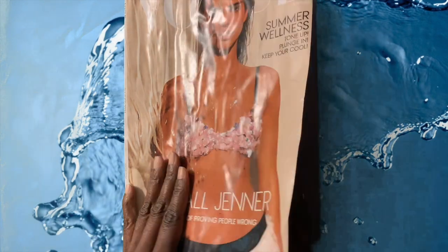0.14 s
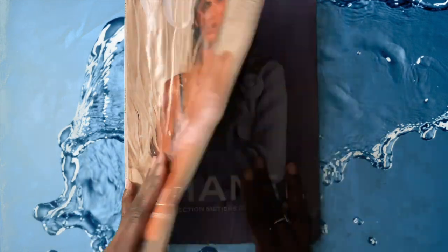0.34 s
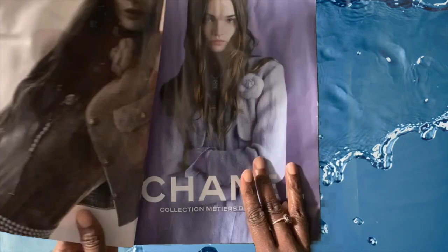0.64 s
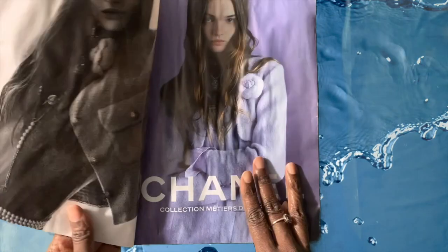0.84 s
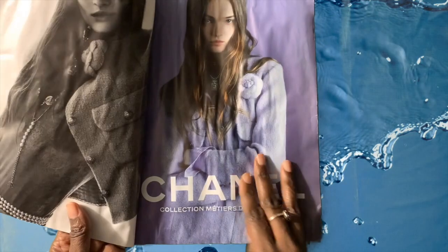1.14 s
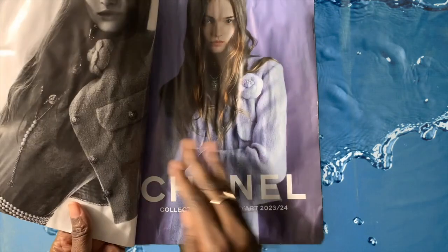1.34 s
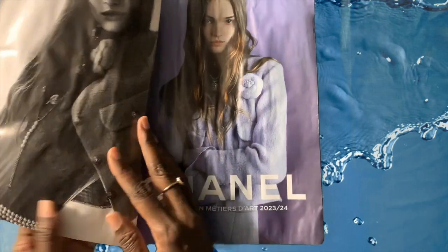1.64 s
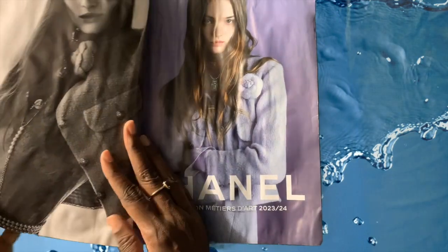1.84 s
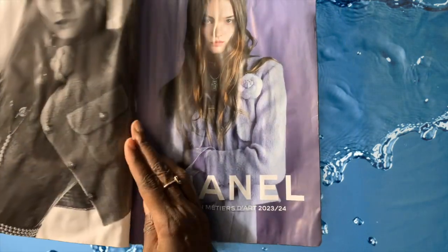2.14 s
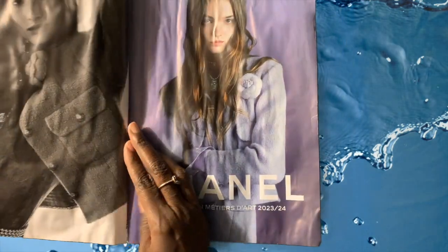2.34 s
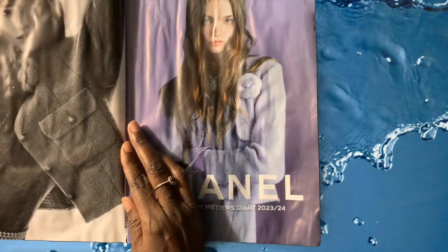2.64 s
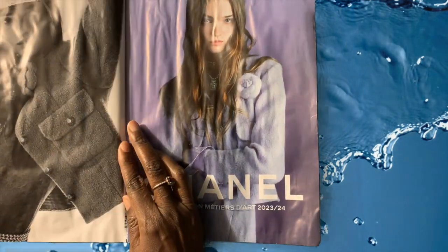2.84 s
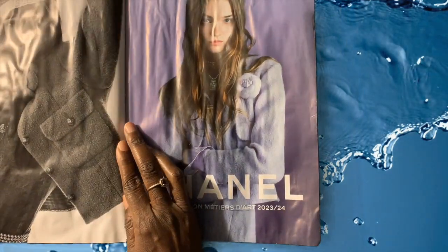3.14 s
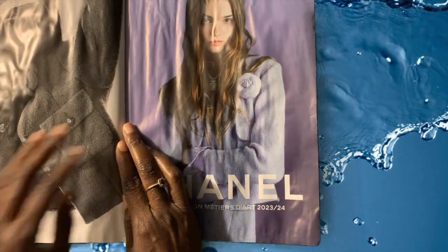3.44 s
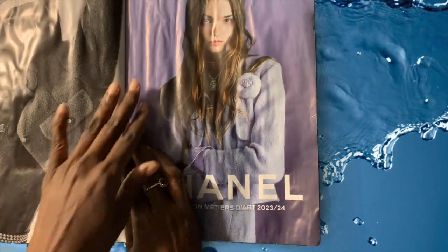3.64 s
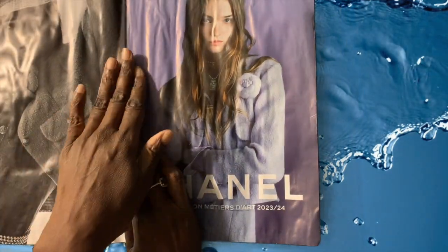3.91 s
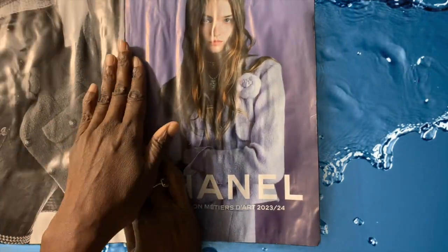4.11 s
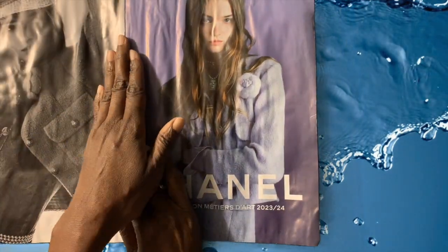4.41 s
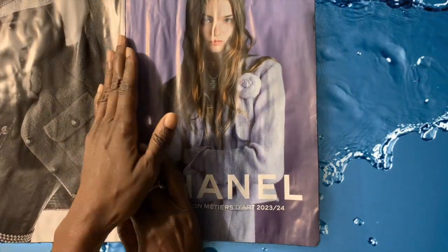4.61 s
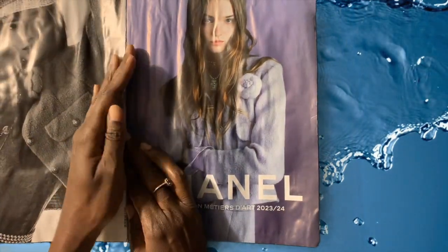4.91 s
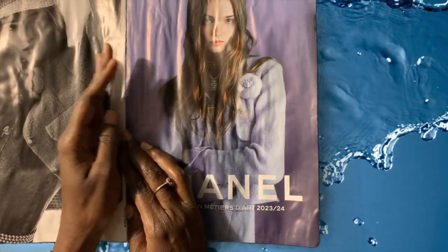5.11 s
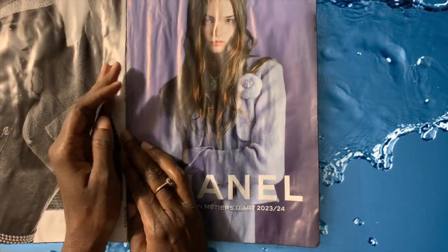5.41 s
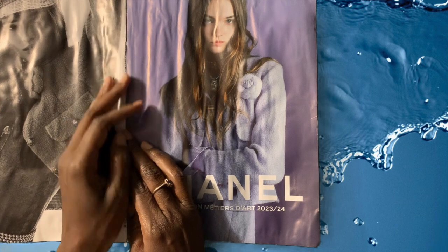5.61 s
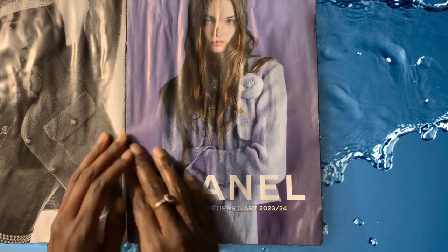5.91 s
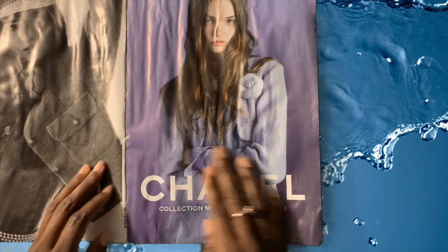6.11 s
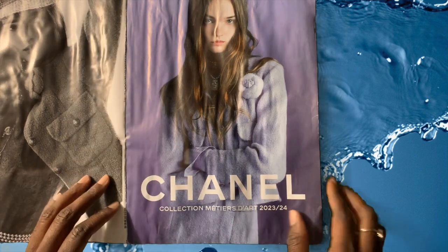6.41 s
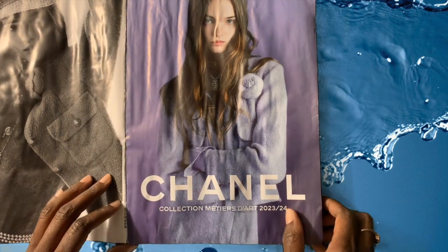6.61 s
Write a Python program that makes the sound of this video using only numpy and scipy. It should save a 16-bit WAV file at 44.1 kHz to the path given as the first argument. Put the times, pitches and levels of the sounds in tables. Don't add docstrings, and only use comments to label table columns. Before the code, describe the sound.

Hands turn and flatten a stiff, shiny magazine page on a table. Crisp cracks and tiny ticks come in irregular clusters, with soft papery rustle between them. Skin rubs the gloss in short hisses at first, then in longer, louder swishes near the end. The pickup is close and stereo, the room short and dry, with steady low beating hum and faint hiss.

```python
import sys
import numpy as np
from scipy import signal
from scipy.fft import rfft, irfft, next_fast_len
from scipy.io import wavfile
from scipy.ndimage import uniform_filter1d, map_coordinates

SR = 44100
rng = np.random.default_rng(int(sys.argv[2]) if len(sys.argv) > 2 else 0)


def digitize_waveform(pressure):
    field = np.atleast_2d(pressure).T
    bounded = np.clip(field, -1, 1)
    quanta = np.round(bounded * 32767).astype(np.int16)
    wavfile.write(sys.argv[1], SR, quanta)


def how_loud(loudness_db):
    steps = np.asarray(loudness_db, float) / 20
    return 10 ** steps


N = 298116


def unit(x):
    return x / np.sqrt(np.mean(x ** 2) + 1e-20)


def crest(x):
    return x / np.abs(x).max()


def along(points, hz):
    f, v = np.transpose(points)
    return np.interp(np.log(hz + 1), np.log(f + 1), v)


def curves(rows):
    s, *cols = np.transpose(rows)
    return [np.interp(np.arange(N) / SR, s, c) for c in cols]


def wobble(rate):
    knots = rng.standard_normal(int(N * rate / SR) + 4)
    return map_coordinates(knots, [np.arange(N) * rate / SR])


def filtered(x, response):
    n = x.shape[-1]
    m = next_fast_len(n + min(n, 4096))
    return irfft(rfft(x, m) * response(np.fft.rfftfreq(m, 1 / SR)), m)[..., :n]


def peak(hz, centre_hz, q):
    damping = 1j * hz * centre_hz / q
    return damping / (centre_hz ** 2 - hz ** 2 + damping)


def rush(spectrum, patchy_db):
    mottle_db = 2.5
    z = signal.stft(rng.standard_normal((2, N)), nperseg=256)[2]
    patches = uniform_filter1d(rng.standard_normal(z.shape[1:]), 8, 0)
    patches = uniform_filter1d(patches, 10, 1)
    pair = signal.istft(z * how_loud(patchy_db * unit(patches)), nperseg=256)[1][:, :N]
    z = signal.stft(pair, nperseg=2048)[2]
    flecks = uniform_filter1d(rng.standard_normal(z.shape[1:]), size=2, axis=0)
    flecks = uniform_filter1d(flecks, size=2, axis=1)
    pair = signal.istft(z * how_loud(mottle_db * unit(flecks)), nperseg=2048)[1][:, :N]
    return unit(filtered(pair, lambda hz: how_loud(along(spectrum, hz))))


# (f/Hz, t60/s)
ROOM_T60 = [(200, 0.36), (1200, 0.17), (4000, 0.25), (12000, 0.18)]
# (f/Hz, level/dB)
ROOM_COLOUR = [(500, -0.5), (1500, -1), (2500, 2.5), (4000, 3)]


def add_with_room(out, s, burst, wet_db):
    hz, t, z = signal.stft(rng.standard_normal((2, SR // 4)), SR, nperseg=128)
    decay_db = along(ROOM_COLOUR, hz)[:, None] - 60 * t / along(ROOM_T60, hz)[:, None]
    tail = signal.istft(z * how_loud(decay_db), SR, nperseg=128)[1]
    wet = signal.fftconvolve(burst[:1], tail / np.linalg.norm(tail[0]), axes=1)
    late = max(0, -round(s * SR))
    start, burst, wet = max(0, round(s * SR)), burst[:, late:], wet[:, late:]
    out[:, start:start + burst.shape[1]] += burst
    first = start + 200
    out[:, first:first + wet.shape[1]] += how_loud(wet_db - np.array([[0], [3.0]])) * wet


# (t/s, peak level/dB, panel f/Hz, edge level/dB, thump level/dB)
CRACKS = [(0.0042, -18, 1480, -4.5, -24), (0.2795, -25, 1360, -13, -14.5), (1.113, -48.5, 1253, -5.5, -27),
          (1.541, -18.5, 1300, -15.5, -54), (1.637, -46.5, 1010, 0.5, -11),
          (2.0855, -19.5, 1235, -1.5, -58), (2.987, -46, 1187, -3, -30), (3.042, -32, 1020, -22, -24),
          (3.101, -32.5, 750, -22.5, -14), (4.115, -27.5, 1320, 4, -19), (4.179, -21, 1140, -6, -14.5),
          (4.1819, -19.5, 1150, -2.5, -20), (4.1835, -32, 534, -10, -37), (4.376, -47, 1650, -2, -23),
          (4.8833, -15.5, 1530, -30.5, -41), (4.897, -24, 750, -2, -16), (5.356, -53.5, 1260, -21, -11),
          (6.178, -24.5, 1900, -24, -21.5), (6.189, -25, 1370, -11, -13.5), (6.235, -25.5, 1300, 0, -16.5),
          (1.066, -53, 2600, -15, -32)]
# (t/s, peak level/dB, panel f/Hz, belly level/dB, thump level/dB)
POPS = [(0.077, -23, 880, -14.5, -18.5), (0.29, -37, 694, -1, -8), (0.77, -21.5, 803, -12.5, -26),
        (1.2133, -23, 1167, -10, -15.5), (1.688, -44, 605, -10, -12.5), (1.806, -37, 790, -5, -1),
        (2.262, -34.5, 740, -7, -4), (2.282, -42, 450, -18, 1), (2.32, -34, 840, -21, -13.5),
        (2.629, -46.5, 795, -6, -7.5), (3.137, -36, 975, -7, -5.5), (3.646, -40.5, 1100, -31, -33),
        (4.06, -38.5, 990, -4, 2.5), (4.191, -38.5, 1340, -13, 2), (5.962, -46, 600, -12, -4),
        (6.743, -41.5, 770, -17, -26.5)]
# (t/s, peak level/dB, panel f/Hz)
REBOUNDS = [(0.016, -43.5, 1760), (1.5419, -19, 1110), (1.552, -32, 850), (2.1, -35.5, 1500),
            (2.113, -35, 1550), (4.126, -28.5, 2200), (4.887, -22.5, 1020), (4.89, -30, 800),
            (4.918, -35, 2200), (4.939, -38, 1200), (4.945, -40, 1300), (0.075, -37, 910),
            (2.089, -29, 950), (6.181, -32, 1030), (6.2405, -35, 1400), (3.142, -41.5, 690),
            (3.105, -42.5, 620), (4.2, -53, 950), (3.676, -54, 940), (0.298, -40.5, 2100),
            (1.547, -31.5, 2500), (6.03, -41, 1700), (5.953, -47.5, 1200), (4.932, -26.5, 1250),
            (0.2822, -24.5, 1090), (1.226, -43, 1850), (1.241, -45, 1500), (4.12, -32, 1800),
            (4.194, -29, 2180)]
# (t/s, peak level/dB, panel f/Hz)
FLICKS = [(0.2795, -27.5, 2120), (0.79, -46, 1600), (1.214, -41.5, 2740), (1.5415, -24, 2560),
          (2.0855, -44, 2000), (2.261, -51, 2010), (2.32, -58, 1900), (3.101, -37, 1980),
          (4.057, -41, 1500), (0.7835, -37, 920), (0.7755, -35, 706), (2.0858, -29, 3500),
          (2.125, -42, 1700), (2.14, -47, 1650), (2.158, -46, 1750), (4.198, -34, 1330),
          (4.1155, -29, 2400), (4.1795, -27, 2140), (4.183, -23, 2240), (4.8955, -20.5, 2100),
          (6.2355, -49, 2200), (1.801, -44, 900), (1.811, -35, 534), (2.0865, -32, 770),
          (4.8975, -33, 3900), (0.197, -55.5, 1400), (0.18, -57, 1400), (4.9, -33, 400), (4.925, -40, 1150),
          (6.203, -41, 1800), (6.227, -45, 1700), (6.247, -41, 1500), (1.2165, -35, 800),
          (0.7705, -36, 1600), (0.7925, -46, 1500), (4.185, -26, 600), (4.129, -36, 1700),
          (4.067, -40, 600)]


def buckles():
    sharp, dull = 6, 1.97
    cracks = [(s, db, hz, edge, -11, thump, sharp) for s, db, hz, edge, thump in CRACKS]
    pops = [(s, db, hz, -48, belly, thump, dull) for s, db, hz, belly, thump in POPS]
    rebounds = [(s, db, hz, -14, -19, -24, sharp) for s, db, hz in REBOUNDS]
    flicks = [(s, db, hz, -30, -30, -30, sharp) for s, db, hz in FLICKS]
    return cracks + pops + rebounds + flicks


def snaps():
    lead_s = .012
    bend_ms = .9
    afterslip_db, afterslip_s = -37.5, .12
    askew, askew_s = .55, .0006
    out, t = np.zeros((2, N + SR)), np.arange(2200) / SR - lead_s

    def spread(f):
        octaves = np.log(16000 / np.clip(f, 150, 16000))
        return np.exp(2j * np.pi * bend_ms * octaves) / (1 + 1j * f / 4500) ** 2

    for s, db, panel_hz, edge_db, belly_db, thump_db, dull in buckles():
        swell = np.where(t < 0, how_loud(-39 + 60 * t / .035), how_loud(afterslip_db - 60 * t / afterslip_s))
        jerks = how_loud(4 * rng.standard_normal(len(t) // 20).repeat(20))
        slips = rng.standard_normal((2, len(t))) * swell * jerks
        slips[:, t.searchsorted(0)] += [1, 0]
        slips[1, t.searchsorted(rng.uniform(0, askew_s))] += askew * rng.choice([-1, 1])
        slips[:, t.searchsorted(.0035)] -= [.25, 0]

        def ring(f):
            modes = peak(f, panel_hz, 1.31) - 0.15 * peak(f, 2.12 * panel_hz, 1.8)
            corner_hz = dull * panel_hz
            treble_loss = (1 + 1j * f / (corner_hz * 1.26) - (f / corner_hz) ** 2) ** 2
            return spread(f) * peak(f, panel_hz, 2.15) * modes / treble_loss

        panel = filtered(slips, ring)
        edge = filtered(slips, lambda f: spread(f) * (2.1 * peak(f, 4500, 2.2) ** 2 - peak(f, 2700, 1.2) ** 2))
        belly = filtered(slips, lambda f: spread(f) * peak(f, 613, 3.1) ** 2)
        thump = filtered(slips, lambda f: spread(f) * peak(f, 267, 0.92) ** 2)
        burst = crest(panel) + how_loud(edge_db + 2.5) * crest(edge)
        burst = burst + how_loud(belly_db - 3.0) * crest(belly) + how_loud(thump_db + 2.0) * crest(thump)
        add_with_room(out, s - lead_s, how_loud(db) * burst, wet_db=-9.0)
    return out[:, :N]


# (t/s, peak level/dB, f/Hz)
TICKS = [(0.0042, -25, 4605), (0.007, -27, 6160), (0.771, -48.5, 4600), (1.066, -55, 7000),
         (1.541, -43, 4300), (0.28, -41, 3990), (6.2353, -41.5, 4500), (1.1135, -56.5, 6840),
         (1.67, -44.5, 7400), (2.0858, -31, 5340), (2.2225, -42.5, 12900), (2.241, -39, 8300),
         (2.2596, -43, 8300), (2.496, -53.5, 13100), (2.5606, -56, 6000), (2.797, -56, 7470),
         (2.8913, -49.5, 13330), (2.988, -54, 7130), (3.034, -42.5, 7400), (3.059, -40, 8400),
         (3.1198, -39, 6340), (3.13, -35, 6350), (3.1325, -33.5, 6600), (3.387, -57.5, 13300),
         (3.647, -67, 12400), (4.116, -33, 5440), (4.151, -47, 11530), (4.162, -42, 10430),
         (4.8833, -50.5, 5300), (4.897, -37, 7130), (5.1073, -58, 6450), (5.191, -51.5, 12900),
         (6.139, -36, 8050), (4.1828, -32, 5440)]


def ticks():
    out, t = np.zeros((2, N + SR)), np.arange(256) / SR
    for s, db, tick_hz in TICKS:
        spit = rng.standard_normal((2, len(t))) * how_loud(-60 * t / 0.007)
        spit = filtered(spit, lambda f: peak(f, tick_hz, 0.58) ** 3)
        add_with_room(out, s, how_loud(db + 5.5) * crest(spit), wet_db=-9.5)
    return out[:, :N]


# (t/s, drag level/dB, slackness 0-1)
DRAG = [
    [(0.0, -82.5, .5), (0.17, -68, 0.3), (0.28, -69.5, 0.35), (0.39, -69, 0.53), (0.71, -71, 0.33),
     (0.87, -92.5, 0), (1.1, -78, 0.1), (1.29, -72, 0.9)],
    [(1.57, -68, 0.9), (1.69, -74, 0.2), (1.74, -62.5, 0.98), (1.93, -66, 0.6), (2.18, -58.5, 0.1),
     (2.34, -73.5, 0.63), (3.04, -74.5, 0.45), (3.24, -103, 0), (3.64, -81.5, 0.32)],
    [(3.65, -65.5, 1), (3.827, -71.5, .9), (4.177, -59.5, 0), (4.231, -70.5, 0.4), (4.389, -66, 0.26),
     (4.463, -76.5, 0.1), (4.735, -62, 0), (4.877, -69.5, 0.66), (5.445, -74.5, 0.3)],
    [(5.449, -65, 0.26), (5.641, -58, 0.25), (5.977, -68.5, 0.6), (6.221, -89, 0.5), (6.323, -63, 0.35),
     (6.535, -85.5, 0.7), (6.76, -65, 0.07)],
]
# (middle t/s, half length t/s, extra level/dB)
LIFTS = [
    (0.205, 0.21, 5),
    (1.844, 0.4, 15),
    (3.844, 0.16, -19),
    (4.25, 0.17, 9.5),
    (5.15, 0.37, -20.5),
    (6.1, 0.26, 11),
]
# (f/Hz, level/dB per Hz)
TAUT_SHEET = [(500, -40.5), (900, -22.5), (1650, 0), (2500, -10), (3700, -16), (6000, -20)]
# (f/Hz, level/dB per Hz)
SLACK_SHEET = [(450, -35), (800, -6), (1200, 4.5), (1600, -2.5), (3000, -24.5), (6000, -32.5)]
# (f/Hz, level/dB per Hz)
FLAP = [(120, -28), (250, -9.5), (600, 2.5), (900, 7), (1400, -38.5)]


def sheet():
    drag_db, slack = curves(np.concatenate(DRAG))
    t = np.arange(N) / SR
    lift_db = sum(db * np.clip(1 - np.abs(t - s) / half, 0, 1) for s, half, db in LIFTS)
    flap_db = -76.5 + 0.31 * (drag_db + 68) + lift_db
    turn = np.pi / 2 * np.clip(slack, 0, 1)
    grip = 0.5 * wobble(27) + 0.5 * wobble(250)
    taut = np.cos(turn) * rush(TAUT_SHEET, patchy_db=3.3)
    loose = np.sin(turn) * rush(SLACK_SHEET, patchy_db=3.0)
    flapping = how_loud(flap_db + 1.5 * grip) * rush(FLAP, patchy_db=1.5)
    return how_loud(drag_db + grip) * (taut + loose) + flapping


def slope(start, length, first_db, last_db, rise, fall):
    t = np.arange(N) / SR - start
    course = np.interp(t, [0, length], [first_db, last_db])
    return course + rise * np.minimum(t, 0) - fall * np.maximum(t - length, 0)


# (start t/s, length t/s, first level/dB, last level/dB, lower hiss level/dB)
STROKES = [(0.416, 0.16, -85, -69, 7), (0.557, 0.1, -70, -66.5, 4), (1.393, .21, -75.5, -60.5, 5.5),
           (1.614, 0.076, -61, -57, -1), (1.689, 0.19, -52.5, -64, 3), (0.997, .03, -73, -73, -7),
           (1.071, 0.057, -76, -73.5, -2.5), (1.869, 0.057, -64, -50, 4.5), (1.92, 0.18, -54.5, -76.5, 4.5),
           (2.18, 0.092, -74.5, -59, 0), (2.266, 0.17, -65, -81.5, 4), (2.941, 0.11, -79.5, -65, 8),
           (3.039, 0.066, -69.5, -52.5, 7.5), (3.648, 0.26, -62, -66, 0), (3.939, 0.21, -68, -60.5, 1.5),
           (4.614, 0.06, -85.5, -72, 13), (4.658, 0.14, -71, -62, 4.5), (5.453, 0.052, -70, -59, 4),
           (5.495, .24, -56.5, -54.5, 2.5), (5.754, 0.38, -59, -47, -2.5),
           (6.131, 0.26, -44.5, -57.5, -3.5), (6.468, 0.021, -70.5, -58, -9.5),
           (6.482, 0.22, -68, -79, -6.5)]
# (t/s, peak level/dB, fade/dB per s, lower hiss level/dB)
BRUSHES = [(0.006, -53, 328.5, 3.5), (0.29, -81, 100, 5), (2.09, -73.5, 155, 15), (2.5, -78.5, 393, 4),
           (2.559, -72.5, 147, 2.5), (2.8, -75, 454, 9), (2.89, -78, 993.5, -6), (3.38, -83, 87, 3),
           (2.825, -73, 800, -4), (4.191, -79, 208, 12.5), (4.381, -71.5, 233, 9), (4.902, -62, 254, 5.5),
           (5.118, -86, 589, -10), (5.193, -69.5, 288, 4), (5.358, -73.5, 495, 8.5)]
# (f/Hz, level/dB per Hz)
SKIN = [(4000, -52), (7000, -5), (9500, 1.5), (12000, -1), (15500, -2.5)]
# (f/Hz, level/dB per Hz)
GLOSS = [(600, -31.5), (1300, -6.5), (2000, -5.5), (2700, -11.5), (3800, -4.5), (4800, -7), (6500, -2),
         (8500, -17), (11000, -20.5)]


def palms():
    land, lift, brush_rise = 1799, 282, 702
    touches = [(slope(s, n, a, b, land, lift), low) for s, n, a, b, low in STROKES]
    touches += [(slope(s, 1 / SR, db, db, brush_rise, fade), low) for s, db, fade, low in BRUSHES]
    hiss_db = np.max([db for db, low in touches], axis=0)
    lower_db = np.max([db + low for db, low in touches], axis=0)
    grip = 0.75 * wobble(25) + 0.78 * wobble(400)
    skin = how_loud(hiss_db + 5.0 + grip) * rush(SKIN, patchy_db=2.0)
    return skin + how_loud(lower_db - 1.5 + grip) * rush(GLOSS, patchy_db=2.5)


# (t/s, level/dB)
POCKET = [
    (3.644, -100),
    (3.65, -66),
    (3.72, -69),
    (3.76, -67),
    (3.8, -73),
    (3.87, -67.5),
    (3.9, -92),
]


def pocket():
    air = filtered(rng.standard_normal((2, N)), lambda f: peak(f, 1220, q=8) ** 2)
    opened = np.arange(N) > POCKET[-1][0] * SR
    return how_loud(curves(POCKET)[0] + 1.5 * wobble(30) - 200 * opened) * unit(air)


# (f/Hz, rms level/dB, start phase/turns)
MOTORS = [(58.29, -51, -.11), (49.06, -63, .11), (83.69, -63, -.39), (174.87, -76, .02)]
# (t/s, f/Hz)
FAN_HZ = [(0, 50.17), (.75, 50.34), (1.25, 50.16), (1.75, 49.96), (2.5, 49.83), (3.25, 49.96), (4, 50.05),
          (4.75, 50.13), (6.76, 50.1)]


def hum():
    t = np.arange(N) / SR
    tones = sum(how_loud(db + .4 * wobble(0.64)) * np.cos(2 * np.pi * (hz * t + turns)) for hz, db, turns in MOTORS)
    fan_turns = np.cumsum(curves(FAN_HZ)[0]) / SR + .34
    fan = how_loud(-55.0 + .4 * wobble(4.5)) * np.cos(2 * np.pi * fan_turns)
    both = np.sqrt(2) * (tones + fan)
    return np.array([both, np.interp(t - 2.5e-4, t, both)])


# (f/Hz, level/dB per Hz)
ROOM_HISS = [(20, -35.5), (40, -4.5), (60, 2.5), (100, -8), (175, -10.5), (240, -24), (500, -32),
             (750, -42), (1150, -25), (1800, -40.5), (2500, -46), (5000, -58)]
# (f/Hz, level/dB per Hz)
SELF_NOISE = [(1500, -33.5), (2500, -0.5), (5000, 4), (10000, -0.5), (15500, 1)]


def room_hiss():
    air = how_loud(-60 + 0.4 * wobble(26.0)) * rush(ROOM_HISS, patchy_db=1.8)
    return air + how_loud(-80.5) * rush(SELF_NOISE, patchy_db=4.0)


def ports(pair, alike):
    turn = lambda hz: np.arccos(np.clip(along(alike, hz), 0, 1)) / 2
    shared, own = filtered(pair, lambda hz: [np.cos(turn(hz)), np.sin(turn(hz))])
    return np.array([shared + own, shared - own])


# (f/Hz, likeness)
FAR = [(60, 0.89), (200, 0.4), (600, 0.4), (2000, 0.1), (3800, 0.2), (4750, .95), (5600, 0.8),
       (6600, 0.975)]
# (f/Hz, likeness)
NEAR = [(300, 0.49), (1500, 0.57), (2500, 0.18), (3800, 0.095), (4400, .4), (4900, 0.93), (5600, 0.5),
        (6600, 0.92)]
# (f/Hz, likeness)
SNAP_ALIKE = [(300, 0.46), (1500, 0.59), (2500, 0.17), (4750, .02), (7000, .6), (9000, 0.9)]


def scene():
    impacts = ports(snaps() + ticks(), SNAP_ALIKE)
    friction = ports(sheet() + palms() + pocket(), NEAR)
    return impacts + friction + hum() + ports(room_hiss(), FAR)


def low_pass(x):
    return signal.sosfilt(signal.butter(12, 15610, fs=SR, output="sos"), x)


# (f/Hz, level/dB)
TILT = [(60, -1), (250, -2), (700, -2.2), (1200, -1), (2250, -3.5), (3500, -1.5), (8000, 0)]
# (f/Hz, phase/turns)
PORT_TURNS = [(1900, 0), (4750, .5), (6950, 1), (9720, 1.5), (12250, 2), (15000, 2.5)]


def record(dry):
    dwell = .46
    lag = lambda hz: 2 * np.pi * np.interp(hz, *np.transpose(PORT_TURNS))
    lead = lambda hz: np.exp(.5j * (lag(hz) - dwell * np.sin(2 * lag(hz))))
    half = lambda hz: how_loud(along(TILT, hz) / 2) * lead(hz)
    spaced = filtered(dry, lambda hz: [half(hz), 1 / half(hz)])
    return low_pass(spaced)


dry = scene()
out = record(dry)
digitize_waveform(out)
```